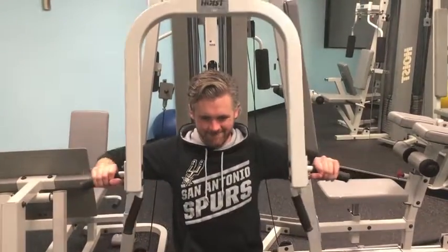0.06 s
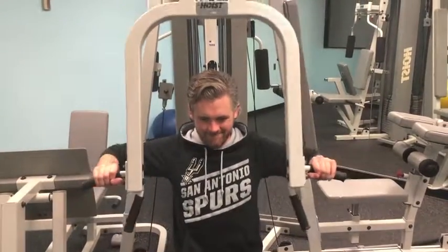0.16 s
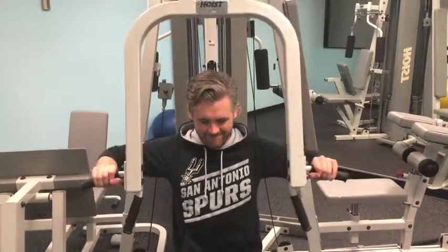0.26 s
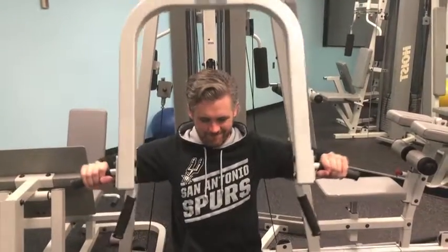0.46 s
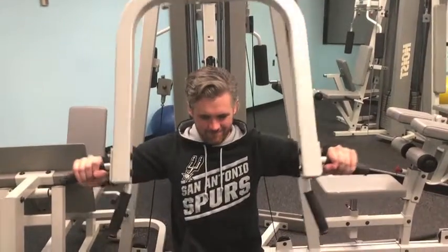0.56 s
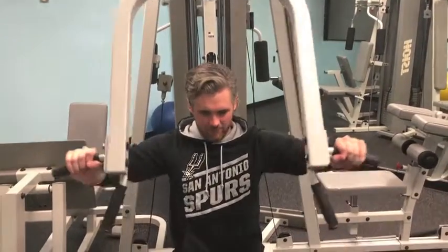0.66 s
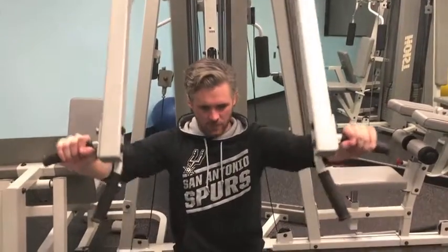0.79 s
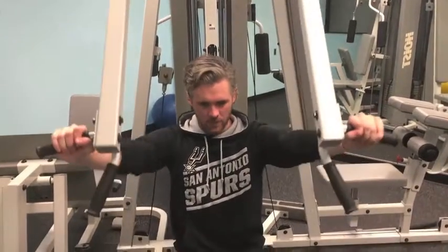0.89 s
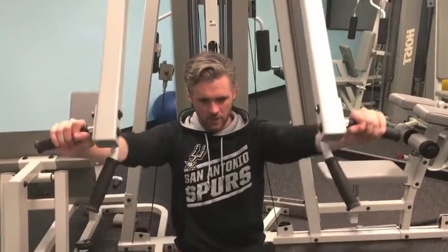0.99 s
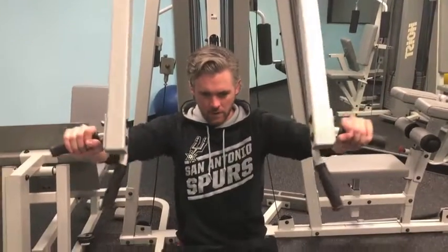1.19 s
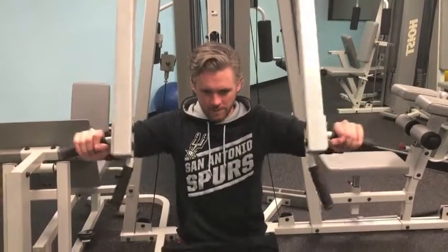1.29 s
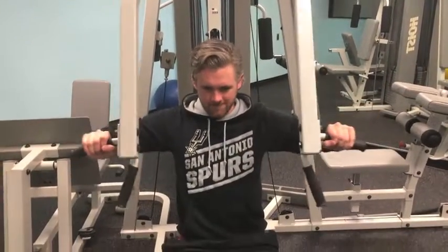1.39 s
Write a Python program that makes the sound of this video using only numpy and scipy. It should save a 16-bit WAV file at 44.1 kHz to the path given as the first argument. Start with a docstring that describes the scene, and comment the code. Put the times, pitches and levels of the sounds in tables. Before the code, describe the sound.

In a gym with a steady low rumble, a weight stack clanks down loudly and rings through the room. A soft scrape follows as the machine moves, then a weaker metallic click and a faint tick.

```python
"""Gym, chest press. The weight stack lands: steel plates slap together in a quick cascade, the base
thumps and rebounds, the frame rings on. As the next push starts, the moving parts rub and keep the
frame humming; a small steel fitting clicks, then ticks. Low room rumble throughout."""
import sys
import numpy as np
from scipy import signal
from scipy.fft import rfft, irfft
from scipy.io import wavfile

SR = 44100
rng = np.random.default_rng(int(sys.argv[2]) if len(sys.argv) > 2 else 0)


def bounce(signal):
    """Save signal as a 16-bit WAV file at the path given by the first command-line argument."""
    frames = np.transpose(np.atleast_2d(signal))
    limited = np.clip(frames, -1, 1)
    pcm = np.round(limited * 32767).astype(np.int16)
    wavfile.write(sys.argv[1], SR, pcm)


N = 63945
T = np.arange(N) / SR
FREQS = np.fft.rfftfreq(N, 1 / SR)
LANDING_S = 0.236


def undb(db):
    """Decibels to gain."""
    return 10 ** (np.asarray(db) / 20)


def column(table, hz, index):
    """Table column interpolated over log frequency."""
    rows = np.array(table, float)
    return np.interp(np.log(np.maximum(hz, 1)), np.log(rows[:, 0]), rows[:, index])


def spectral_gain(table):
    """Gain per FFT bin from rows of f/Hz, level/dB."""
    return undb(column(table, FREQS, 1))


def noise(gain):
    """Random-phase noise, rms 1, shaped by a gain per bin."""
    x = irfft(gain * np.exp(2j * np.pi * rng.random(len(FREQS))), N)
    return x / np.std(x)


def decay(start_s, t60_s, rise_s=0.0012):
    """Quick rise, exponential fall."""
    age_s = np.maximum(T - start_s, 0)
    return (1 - np.exp(-age_s / rise_s)) * np.exp(-np.log(1000) * age_s / t60_s)


def ring(modes, start_s, rise_s=0.00054, blur=0, blur_hz=25):
    """Decaying sines; blur adds narrow noise, the waver caused by reflections."""
    out = 0
    for hz, db, t60_s in modes:
        tone = np.sin(2 * np.pi * hz * (T - start_s))
        if blur:
            tone = tone + blur * noise(np.exp(-((FREQS - hz) / blur_hz) ** 2))
        out = out + undb(db) * decay(start_s, t60_s, rise_s) * tone
    return out


def mode_comb(gap_hz):
    """Line spectrum: one mode at random in each gap, Rayleigh strength."""
    offset, quantile = rng.random((8000, 2)).T
    bins = ((np.arange(len(offset)) + offset) * gap_hz / FREQS[1]).astype(int)
    strength = np.sqrt(-np.log(1 - quantile))
    return np.bincount(bins, strength, minlength=len(FREQS))[:len(FREQS)]


def dense_ring(table, hits, gap_hz, rise_s=0.001):
    """Many lesser modes, each band dying at its own rate; hits add in energy."""
    spectrum = rfft(noise(mode_comb(gap_hz) * spectral_gain(table)))
    edges_hz = np.geomspace(30, 17000, 41)
    out = 0
    for lo, hi in zip(edges_hz, edges_hz[1:]):
        band = irfft(spectrum * ((FREQS >= lo) & (FREQS < hi)), N)
        t60_s = column(table, np.sqrt(lo * hi), 2)
        energy = sum((undb(db) * decay(s, t60_s, rise_s)) ** 2 for s, db in hits)
        out = out + np.sqrt(energy) * band
    return out


def crack(table, hits, t60_s):
    """Brief noise burst at each contact."""
    return noise(spectral_gain(table)) * sum(undb(db) * decay(s, t60_s) for s, db in hits)


def room_rumble():
    """Steady low rumble, trace of hiss."""
    # room spectrum: f/Hz, relative level/dB
    colour = [(20, -19.5), (45, -2.5), (85, 3.5), (135, 2), (190, -6), (290, -3.5), (450, -12.5),
              (900, -17), (1600, -27), (2700, -33.5), (6000, -38), (10000, -42.5), (15000, -45)]
    return undb(-53) * noise(spectral_gain(colour))


def friction():
    """Rub envelope: Gaussian swells as the arms move."""
    # rubs: t/s, half length/s, relative level/dB
    swells = [(0.036, 0.089, -6.5), (0.771, 0.041, 7), (1.304, .06, -1.5)]
    return sum(undb(db) * np.exp(-((T - s) / half_s) ** 2) for s, half_s, db in swells)


def rubs():
    """Broadband scrape of the sliding parts."""
    # scrape spectrum: f/Hz, relative level/dB
    colour = [(200, -3), (700, 9.5), (1150, -3), (1850, -1), (2400, -8), (4000, -27.5), (7000, -26),
              (9000, -19), (11500, -35)]
    return undb(-60) * friction() * noise(spectral_gain(colour))


def frame_hum():
    """Narrow resonances, driven by the motion, raised by each rub, struck by the landing."""
    # frame resonances: f/Hz, width/Hz, landing level/dB, moving level/dB, rub level/dB
    resonances = [(268.73, 3.4, -49, -61, -63.5), (300, 20, -49.5, -68.5, -61), (537.5, 10, -49, -71, -75),
                  (578, 21, -46.5, -75, -72), (710.4, 5.2, -44, -73.5, -70.5), (807.3, 14, -47.5, -82, -86),
                  (1089, 21, -49, -70, -64), (1134, 20, -47, -76, -90), (1324, 55, -53, -79.5, -72),
                  (1532, 42, -55, -74.5, -65), (1802, 50, -66, -78, -65.5), (2052, 33, -66.5, -84, -77.5)]
    struck = decay(LANDING_S, t60_s=2.6, rise_s=0.026)
    rubbed = friction()
    out = 0
    for hz, width_hz, hit_db, moving_db, rub_db in resonances:
        hum = noise(1 / (1 + ((FREQS - hz) / (width_hz / 2)) ** 2))
        energy = (undb(hit_db) * struck) ** 2 + undb(moving_db) ** 2 + (undb(rub_db) * rubbed) ** 2
        out = out + hum * np.sqrt(energy)
    return out


def base_thumps():
    """The load thumps into the base and rebounds, exciting its low modes."""
    # thumps and soft knocks: t/s, relative level/dB
    thumps = [(0.057, -39.5), (.198, -44), (0.228, -23), (0.2446, -13), (.318, -22.5), (0.346, -24),
              (0.476, -37.5)]
    # base modes: f/Hz, relative level/dB, t60/s
    modes = [(84.36, -17.5, 0.83), (100, 6.5, 0.062), (130.3, -8, 0.11), (181.2, -12.5, 0.15)]
    return sum(undb(db) * ring(modes, s, rise_s=0.0088) for s, db in thumps)


def weight_stack():
    """Steel plates slap shut in a cascade and ring."""
    # plate contacts: t/s, relative level/dB
    hits = [(0.2265, -14.5), (0.2325, -1), (0.2361, 4), (0.2395, 2.5), (0.245, 1.5), (.2545, -15),
            (0.272, -28), (0.277, -20)]
    # stack spectrum: f/Hz, relative level/dB, t60/s
    bands = [(159.8, -15, 0.18), (420, -5, 0.3), (626, -6, 0.23), (800, 6.5, 0.24), (1040, -7.5, 0.39),
             (1370, 0, 0.42), (2186, -0.5, 0.37), (2770, -9.5, 0.42), (3100, -12, 0.65), (3320, -3.5, 0.28),
             (3900, -11, 0.44), (4800, -10.5, 0.34), (6760, -8.5, 0.25), (7030, -15, 0.32),
             (10380, -22, 0.24), (15000, -17.5, .19)]
    # strong plate modes: f/Hz, level/dB, t60/s
    modes = [(581.5, -38.5, 1), (778, -30, 0.34), (807.7, -30, 0.52), (895.7, -29.5, .3),
             (1137.5, -33, 0.77), (1274, -29.5, .55), (1287, -25, .33), (1371, -33, 0.61),
             (1495, -23.5, 0.26), (1508, -32.5, 0.64), (1780, -39, 0.42), (1916, -33.5, .35),
             (2034, -23, 0.45), (2062, -21.5, .33), (2298, -39.5, 0.65), (2320, -27.5, 0.29),
             (2862, -43.5, 0.73), (3400, -29.5, .33), (3410, -37, 0.6), (3656, -39, .42), (3880, -39, .32),
             (4040, -45.5, 0.5), (4400, -42, .45), (5028, -28.5, .2), (5560, -37, 0.13), (6481, -38.5, .22)]
    slaps = undb(-28) * crack(bands, hits, t60_s=0.028)
    body = undb(-25) * dense_ring(bands, hits, gap_hz=18)
    tones = ring(modes, LANDING_S, rise_s=0.0073, blur=0.18, blur_hz=24)
    return slaps + body + tones


def room_tail():
    """The room reverberates after the landing."""
    # tail spectrum: f/Hz, relative level/dB, t60/s
    bands = [(60, -2, 1.9), (130, -3, 3.3), (200.8, -7.5, 3.9), (422.4, -10, 2.55), (693, 2, 2),
             (1060, -12, 2.4), (1848, 0.5, 1), (2660, -16.5, 1.08), (4370, -27, 1.28), (8000, -35, 0.75),
             (11020, -46, .35)]
    return undb(-33.5) * dense_ring(bands, [(LANDING_S, 0)], gap_hz=3, rise_s=0.0297)


def fitting():
    """A small steel part clicks, bounces once, later ticks."""
    # click and bounce: t/s, relative level/dB, tilt/(dB/octave)
    clicks = [(1.1693, -4.5, 4.5), (1.1862, -10, 2)]
    # click spectrum: f/Hz, relative level/dB, t60/s
    click_bands = [(596, -5.5, 0.24), (2050, -10.5, 0.58), (2540, -18, 0.54), (3860, -5, 0.24),
                   (4700, -2.5, 0.33), (6200, -1.5, 0.27), (8060, -21, 0.35), (9800, -7.5, 0.24),
                   (12500, -20, 0.15), (15000, -17, 0.17)]
    # strong fitting modes: f/Hz, relative level/dB, t60/s
    modes = [(2985, -46, 0.24), (4571, -55, .2), (4570, -53, 0.17), (4770, -46, 0.38), (4860, -51, 0.28),
             (5030, -61, 0.46), (5329, -57, 0.13), (5710, -50, 0.077), (6030, -54, .24), (8100, -60, 0.23),
             (9410, -54, 0.23), (10420, -58, 0.17), (13730, -60, .14)]
    # tick spectrum: f/Hz, relative level/dB, t60/s
    tick_bands = [(1500, -5.5, 0.033), (2630, -11, .02), (3360, 0.5, 0.029), (4200, -10, .02),
                  (5000, -9, .018), (7900, -21, 0.012), (13100, -17, 0.013)]
    gap_hz, pivot_hz, tick_s = 35.94, 6000, 1.3998
    hits = [(s, db) for s, db, _ in clicks]
    body = undb(-42) * dense_ring(click_bands, hits, gap_hz)
    snaps = undb(-34) * crack(click_bands, hits, t60_s=0.05)
    tones = 0
    for s, hit_db, tilt in clicks:
        tilted = [(hz, db + hit_db + tilt * np.log2(hz / pivot_hz), t60_s) for hz, db, t60_s in modes]
        tones = tones + ring(tilted, s, blur=1, blur_hz=46)
    tick = undb(-50) * dense_ring(tick_bands, [(tick_s, 0)], gap_hz, rise_s=0.00034)
    return body + snaps + tones + tick


def scene():
    """Machine and room, mono."""
    landing = weight_stack() + room_tail() + base_thumps()
    return (landing + frame_hum() + rubs() + fitting() + room_rumble())[None]


def record(dry):
    """Steep elliptic low-pass."""
    cutoff_hz = 15300
    return signal.sosfilt(signal.ellip(10, 0.2, 80, cutoff_hz, fs=SR, output="sos"), dry)


dry = scene()
out = record(dry)
bounce(out)
```